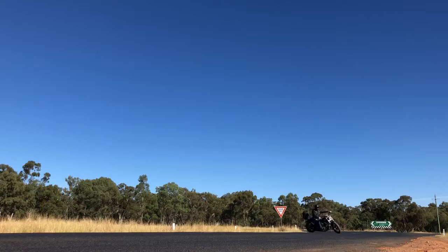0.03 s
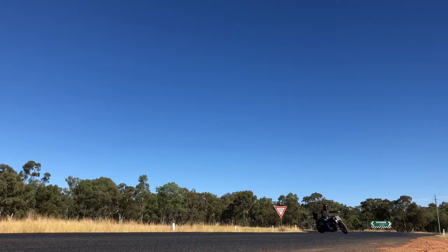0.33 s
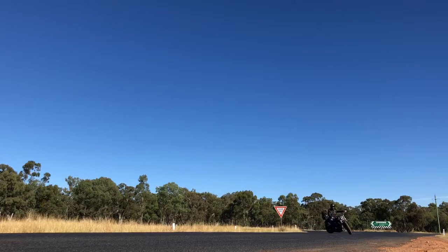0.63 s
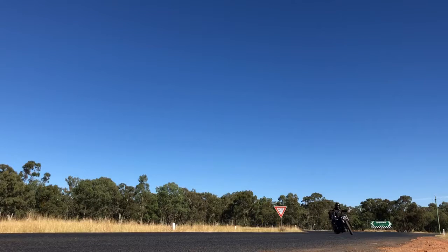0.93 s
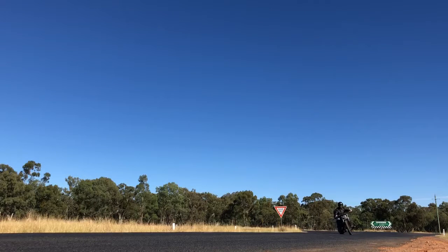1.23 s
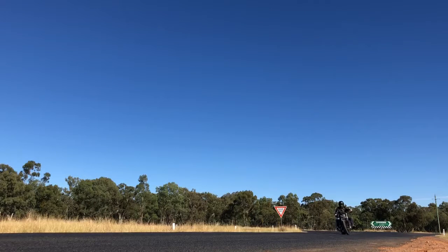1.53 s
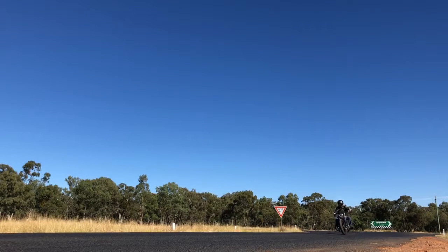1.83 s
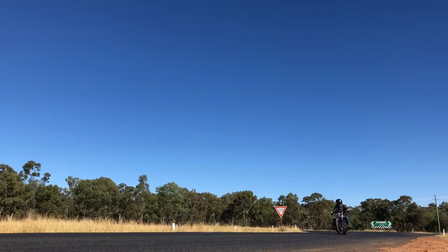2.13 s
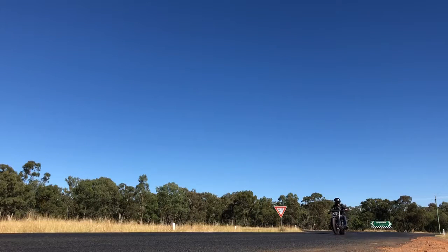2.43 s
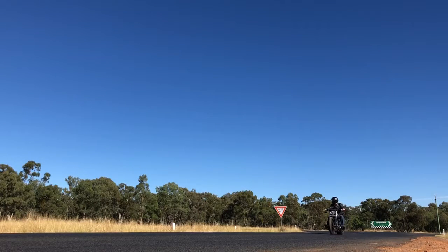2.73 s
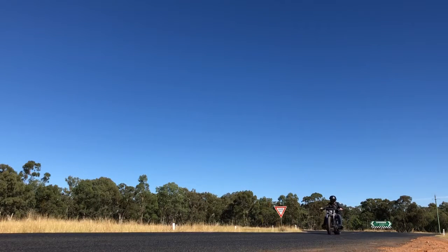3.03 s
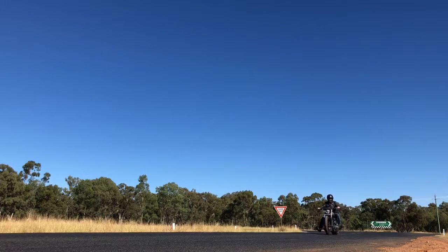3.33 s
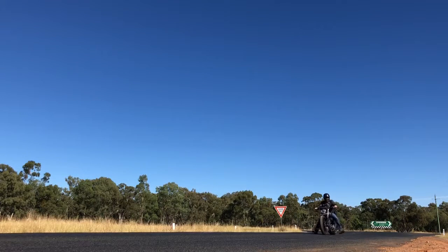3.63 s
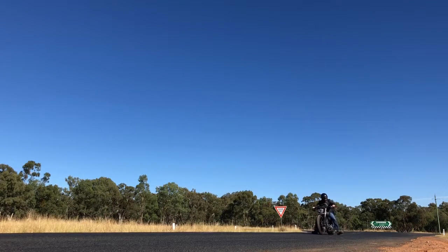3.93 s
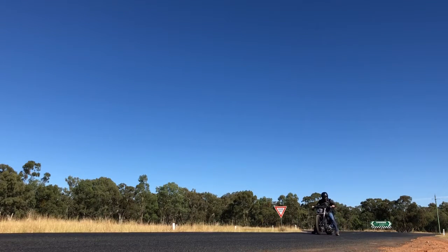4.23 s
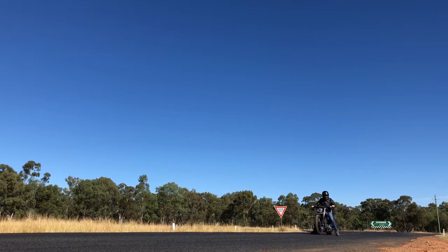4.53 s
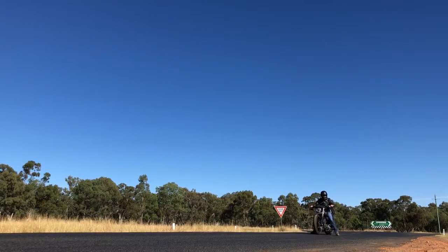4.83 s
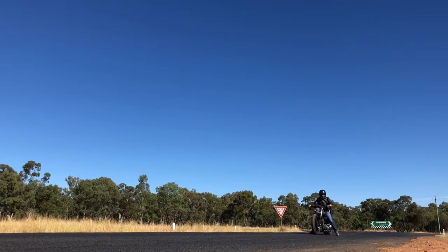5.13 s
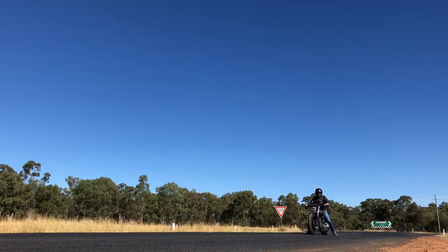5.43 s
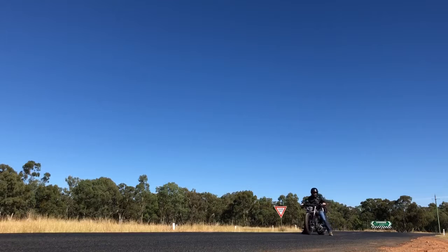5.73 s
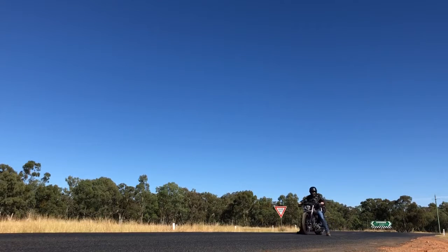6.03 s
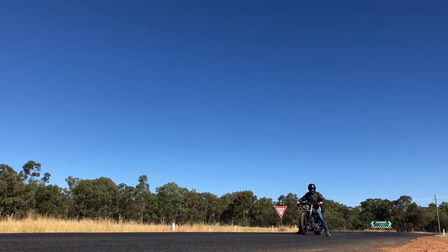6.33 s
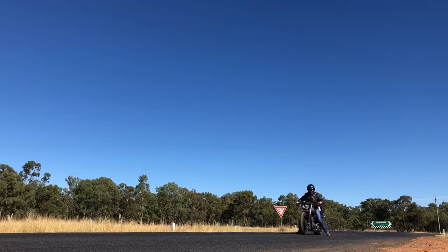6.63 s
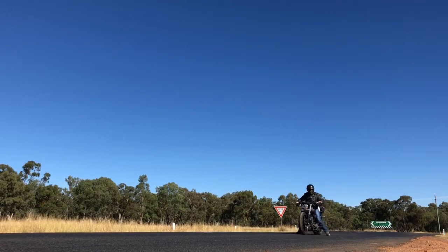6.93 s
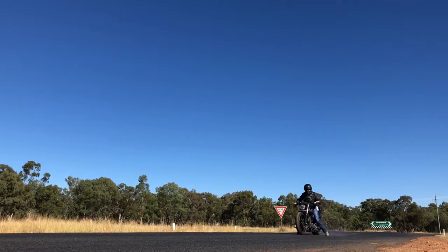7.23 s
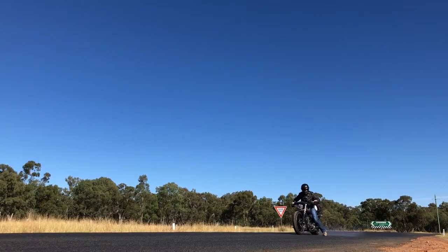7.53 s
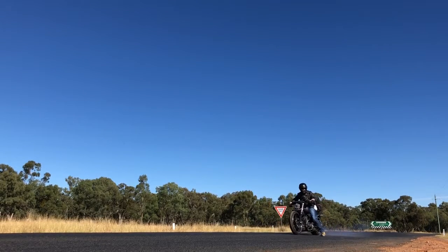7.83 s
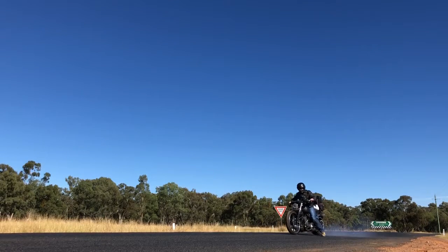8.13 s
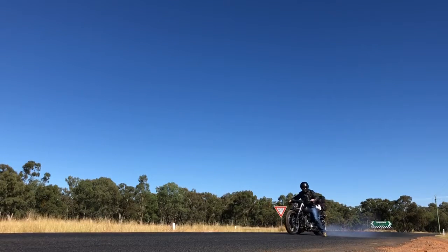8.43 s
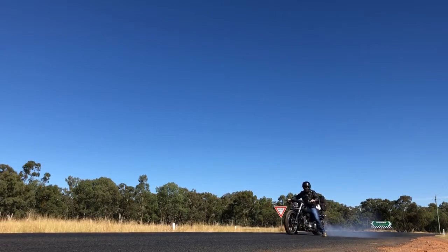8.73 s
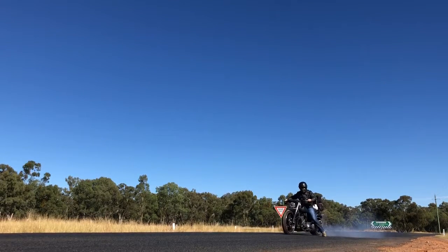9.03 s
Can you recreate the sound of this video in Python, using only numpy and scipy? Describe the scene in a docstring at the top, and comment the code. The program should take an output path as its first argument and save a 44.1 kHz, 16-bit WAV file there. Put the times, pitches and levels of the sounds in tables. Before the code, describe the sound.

Outdoors on an asphalt road, a motorcycle's deep twin-cylinder engine lopes and stumbles, some firings cracking out hard. The throttle opens gently twice, then the engine rises to a loud, rasping rev. It falls briefly and surges into a burnout, holding high revs while the spinning rear tyre adds a hiss and a falling howl. A single microphone picks up a light mechanical whirr and a slight, dull echo.

```python
"""V-twin motorcycle burnout.

A big V-twin lopes at idle with a faint squeak of the brake, revs and starts a burnout.
Unevenly spaced firings ring the exhaust, each with a burst of gas; some bark out hard. Valve gear whirrs.
The rear tyre spins and howls on the asphalt, and a line of trees returns a faint echo."""
import sys
import numpy as np
from scipy import signal
from scipy.fft import rfft, irfft
from scipy.io import wavfile
from scipy.ndimage import uniform_filter1d

SR = 44100
rng = np.random.default_rng(int(sys.argv[2]) if len(sys.argv) > 2 else 0)


def int16_out(signal):
    """Quantize to a 16-bit WAV file."""
    q = np.round(np.clip(np.atleast_2d(signal).T, -1, 1) * 32767)
    wavfile.write(sys.argv[1], SR, q.astype(np.int16))


N = 401310
TIME = np.arange(N) / SR
EASE_START_S, EASE_S = 7.45, 1  # the tyre spins freely and the load eases


def undb(db):
    """Decibels to gain."""
    return 10 ** (np.asarray(db) / 20)


def curves(rows, at=TIME):
    """Each later column of a table, interpolated along the first."""
    knots, *columns = np.transpose(rows)
    return [np.interp(at, knots, column) for column in columns]


def ramp(start_s, length_s):
    """Rise from 0 to 1."""
    return np.clip((TIME - start_s) / length_s, 0, 1)


def convolve(x, response):
    """Pass a sound through an impulse response."""
    return signal.oaconvolve(x, response)[:len(x)]


def colour(x, points, size=16384):
    """Minimum-phase filter with the given (Hz, dB) response, so that peaks ring after a blow."""
    hz, db = np.transpose(points)
    bin_hz = np.arange(size // 2 + 1) * SR / size
    gain = undb(np.interp(np.log(bin_hz + 1), np.log(hz), db))
    cepstrum = irfft(np.log(gain))
    cepstrum[1:size // 2] *= 2
    cepstrum[size // 2 + 1:] = 0
    return convolve(x, irfft(np.exp(rfft(cepstrum))))


def ring(x, hz, width_hz):
    """A resonance whose centre can move, gain 1 at the centre."""
    spin = np.exp(2j * np.pi * np.cumsum(hz) / SR)
    pole = np.exp(-np.pi * width_hz / SR)
    return 2 * np.real(spin * signal.lfilter([1 - pole], [1, -pole], x / spin))


def noise(points):
    """Coloured noise of rms 1."""
    x = colour(rng.standard_normal(N), points)
    return x / x.std()


def wander(rate_hz):
    """Smooth random drift of spread 1."""
    hold = int(SR / rate_hz)
    steps = np.repeat(rng.standard_normal(N // hold + 1), hold)[:N]
    drift = uniform_filter1d(steps, hold)
    return drift / drift.std()


def steady(x, size=4400):
    """Bring the running rms to 1, keeping the pulses inside it."""
    power = uniform_filter1d(uniform_filter1d(x ** 2, size), size)
    return x / np.sqrt(np.maximum(power, 0) + np.mean(x ** 2) / 1e6)


def blend(a, b, share):
    """Mix two unrelated sounds; the first gets this share of the power."""
    share = np.clip(share, 0, 1)
    return np.sqrt(share) * a + np.sqrt(1 - share) * b


def pulses(times_s, sizes):
    """One pulse at each time."""
    return np.bincount(np.clip(times_s * SR, 0, N).astype(int), sizes, N + 1)[:N]


def puff(rise_s, fall_s, tail_s, tail_db):
    """Envelope of a burst of gas: it swells, collapses and leaves a tail."""
    t = TIME[:SR // 8]
    after = np.maximum(t - rise_s, 0)
    decay = np.exp(-after / fall_s) + undb(tail_db) * np.exp(-after / tail_s)
    return np.minimum(t / rise_s, 1) ** 2 * decay


# Each row: time in seconds, engine speed in four-stroke cycles per second.
ENGINE_SPEED_HZ = [(0.0, 8.195), (0.255, 7.178), (0.74, 9.518), (2.622, 9.015), (2.927, 12.311),
                   (3.447, 10.357), (3.845, 13.054), (4.302, 11.848), (4.566, 23.719), (5.068, 23.129),
                   (5.363, 27.529), (5.637, 28.94), (5.72, 28.9), (6.31, 21.16), (6.51, 27.0),
                   (6.725, 23.9), (7.028, 40.288), (7.171, 33.717), (7.686, 41.392), (8.35, 47.009),
                   (8.872, 43.075), (9.1, 42.686)]

def speed():
    """Engine cycles per second; the crank turns twice in each."""
    return curves(ENGINE_SPEED_HZ)[0]


def cycles(start=0.1486):
    """Engine cycles turned so far."""
    return start + np.cumsum(speed()) / SR


def firings(shift_cycles=0, rear_lag_cycles=315 / 720):
    """Times in seconds at which the front and rear cylinders, in turn, reach one point of their cycle."""
    turned = cycles()
    front = np.arange(int(turned[-1]) + 1)
    marks = np.column_stack([front, front + rear_lag_cycles]).ravel()
    return np.interp(marks + shift_cycles, turned, TIME, right=TIME[-1] + 1)


# Each row: opening time in seconds, shutting time in seconds, throttle opening 0-1.
THROTTLE_TWISTS = [(2.543, 2.894, 0.43), (3.53, 3.946, 0.11), (4.24, 5.71, 0.86), (6.314, 6.463, 0.5),
                   (6.674, 9.2, 0.9)]

def throttle(open_s=0.14, shut_s=0.041):
    """Opening 0-1: each twist opens, holds and snaps shut."""
    opening = sum(size * ramp(opens, open_s) * (1 - ramp(shuts, shut_s))
                  for opens, shuts, size in THROTTLE_TWISTS)
    return np.clip(opening, 0, 1)


# Each row: engine cycles per second, effort (0 idle, 1 revving free, 2 under load).
EFFORT_BY_SPEED = [(9.5, 0.23), (20, 1), (25, 1), (32, 1.6)]

def combustion(rough_open=0.085, rough_spin=0.06, rough_idle=0.47, rough_overrun=0.48):
    """Effort and roughness: an open throttle fires evenly, a shut one raggedly."""
    effort = curves(EFFORT_BY_SPEED, speed())[0]
    fed = rough_open + (rough_spin - rough_open) * ramp(EASE_START_S, EASE_S)
    starved = np.interp(effort, [0, 1], [rough_idle, rough_overrun])
    return effort, starved + (fed - starved) * throttle() ** 2


def turbulence(roughness):
    """Churn of the gas, 0-0.62: none under full throttle, most when it is shut."""
    return np.clip(1.9 * (roughness - 0.13), 0, 0.62)


def level_db(knee_db, knee_hz, slopes_db_oct, shut_db, idle_hz=8.86):
    """Level of an engine part from throttle and speed, with one slope below a knee and one above."""
    octaves = np.log2(np.maximum(speed(), idle_hz) / knee_hz)
    return knee_db + octaves * np.where(octaves < 0, *slopes_db_oct) + shut_db * (1 - throttle())


# Each row: time in seconds, dip of the boom in dB.
MISFIRE_DIPS = [(.33, -11), (1.3, -15), (2.15, -4), (2.44, -5), (3.14, -3), (3.3, -1.5), (3.51, -2)]

def stumbles_db(width_s=0.041):
    """The idle's boom dips when a cylinder misses."""
    return sum(db * np.exp(-((TIME - at_s) / width_s) ** 2) for at_s, db in MISFIRE_DIPS)


def disperse(x, centres_hz=(190, 340), q=1.0):
    """Bends in the pipe hold the low notes back, so that a pulse leaves as a short wave train."""
    for hz in centres_hz:
        x = 2 * signal.lfilter(*signal.iirpeak(hz, q, fs=SR), x) - x
    return x


# Pipe response at idle, revving free and under load. Each row: frequency in Hz, gain in dB.
PIPE_IDLE_DB = [(25, -131), (48, -16), (70, -1), (84, 3), (102, 4), (135, -2), (175, -1), (230, -12),
                (320, -28), (450, -27), (620, -16.5), (1000, -22.5), (2000, -80), (5000, -83)]
PIPE_FREE_DB = [(25, -107), (48, -2), (85, 6), (119, 6), (142, 2), (170, -7), (212, 0), (245, -14),
                (315, -3.5), (400, -8.5), (560, -18), (720, -22.5), (1500, -25), (4000, -68)]
PIPE_LOAD_DB = [(25, -48), (45, -11), (80, 12.5), (122, 13.5), (162, -2), (225, 10.5), (275, 1.5),
                (330, 8.5), (440, 9), (570, -2), (690, -10.5), (800, -1.5), (950, -16.5), (1250, -10),
                (2000, -30), (5000, -43)]
# Each row: engine cycles per second, lowest pipe note in Hz.
PIPE_NOTE_HZ = [(9, 68), (13, 114.6), (21.5, 96), (24, 118.4), (28.5, 136.7)]

def pipes(drive, effort):
    """The pipes' tone follows effort; hotter gas lifts their lowest note and strong flow damps it."""
    tone = sum(colour(drive * np.maximum(1 - abs(effort - k), 0), response)
               for k, response in enumerate((PIPE_IDLE_DB, PIPE_FREE_DB, PIPE_LOAD_DB)))
    note = ring(tone, curves(PIPE_NOTE_HZ, speed())[0], width_hz=17)
    return tone + undb(7) * np.minimum(2 - effort, 1) * note


def rebound(x, strength, periods=1.08):
    """The blast runs back up the pipe and comes out again, about one period of its note later."""
    delay_s = periods / curves(PIPE_NOTE_HZ, speed())[0]
    return x + 0.25 * strength * np.interp(TIME - delay_s, TIME, x)


# Gas churning in the pipe. Each row: frequency in Hz, gain in dB.
BURBLE_DB = [(110, -16.5), (200, 0.5), (250, 2.5), (310, 4), (390, -4), (480, -3.5), (620, -13.5),
             (900, -26.5), (2000, -44.5)]

def exhaust(scatter_db=5, rear_idle_db=-3, overlap_lag_cycles=0.33):
    """Pressure slugs ring the pipes; valve overlap adds a gulp after each, most with the throttle shut."""
    times = firings()
    effort, roughness = combustion()
    rough = np.interp(times, TIME, roughness)
    idling = np.interp(times, TIME, np.clip(1 - effort, 0, 1))
    slug_draw, slug_shift, gulp_shift, gulp_draw = rng.standard_normal((len(times), 4)).T
    jitter_s = 0.0009 * rough
    rear = np.arange(len(times)) % 2
    slug_sizes = undb(scatter_db * rough * slug_draw + rear_idle_db * rear * idling)
    slugs = pulses(times + jitter_s * slug_shift, slug_sizes)
    gulp_sizes = (0.51 + 1.7 * idling) * rough * undb(5.1 * gulp_draw)
    gulps = pulses(firings(overlap_lag_cycles) + 2 * jitter_s * gulp_shift, gulp_sizes)
    tone = pipes(disperse(slugs - uniform_filter1d(gulps, size=90)), effort)
    boom = signal.sosfiltfilt(signal.butter(4, 190, fs=SR, output="sos"), tone)
    # soft firings burble instead of rasping
    churn = convolve(slugs, puff(rise_s=0.0055, fall_s=0.054, tail_s=0.12, tail_db=1))
    burble = steady(noise(BURBLE_DB) * churn)
    rasp = blend(burble, steady(tone - boom), turbulence(roughness))
    boom_db = level_db(knee_db=-17, knee_hz=21, slopes_db_oct=(11.5, -1), shut_db=-1.5)
    rasp_db = level_db(knee_db=-15, knee_hz=27, slopes_db_oct=(14.5, 1.1), shut_db=-5.5)
    return steady(boom) * undb(boom_db + stumbles_db()) + rasp * undb(rasp_db)


# Turbulent gas. Each row: frequency in Hz, gain in dB.
RUSH_DB = [(100, -17), (250, -42.5), (400, 0.5), (560, 7.5), (780, 9), (980, 5), (1250, 2.5), (1600, -7),
           (1900, -7.5), (2300, -37), (4000, -33), (15000, -52)]
# Each row: time in seconds, centre in Hz of a hollow in the rush.
HOLLOW_HZ = [(0, 480), (4.0, 557), (4.5, 724), (5.1, 780), (5.4, 867), (6.9, 940), (7.8, 1010), (8.3, 715),
             (9.1, 720)]

def gas_rush(blows, effort, churn):
    """A turbulent rush, lingering after rough firings, and a repeating slap that gives the snarl."""
    bursts = convolve(blows, puff(rise_s=0.0007, fall_s=0.005, tail_s=0.02, tail_db=-22))
    rush = steady(noise(RUSH_DB) * (bursts + 1.3 * churn))
    slap = steady(colour(disperse(blows, centres_hz=(600, 950, 1250), q=2.07), RUSH_DB))
    blast = blend(rush, slap, share=0.17 + 1.25 * churn)
    blast = rebound(blast, strength=np.minimum(2 - effort, 1))
    return steady(blast - 1.34 * ring(blast, curves(HOLLOW_HZ)[0], width_hz=128))


# Crack of an ordinary firing. Each row: frequency in Hz, gain in dB.
CRACK_DB = [(600, 2.5), (1500, 6.5), (2200, -3.5), (2900, 1), (4000, -5), (5200, -3), (6200, -2.5),
            (8500, -9.5), (10500, -16.5), (13000, -22), (16000, -22)]

def gas_crack(blows, churn):
    """The wave steepens and cracks a moment after each firing, partly alike every time."""
    burst = puff(rise_s=0.0036, fall_s=0.0014, tail_s=0.0047, tail_db=-9)
    alike = colour(convolve(blows, burst * rng.standard_normal(len(burst))), CRACK_DB)
    fresh = noise(CRACK_DB) * convolve(blows, burst)
    return blend(steady(fresh), steady(alike), share=0.51 + churn)


def gas(scatter_db=4, rear_db=-3):
    """Each firing ejects gas with a rush and a crack; both soften at idle and as the load eases."""
    times = firings()
    effort, roughness = combustion()
    churn = turbulence(roughness)
    size_draw, crack_draw = rng.standard_normal((len(times), 2)).T
    rear = np.arange(len(times)) % 2
    sizes = undb(scatter_db * np.interp(times, TIME, roughness) * size_draw + rear_db * rear)
    rush = gas_rush(pulses(times, sizes), effort, churn)
    crack = gas_crack(pulses(times, sizes * undb(0.95 * crack_draw)), churn)
    eased = ramp(EASE_START_S, EASE_S)
    idling, loaded = np.clip(1 - effort, 0, 1), np.maximum(effort - 1, 0)
    rush_db = -0.5 + 2 * loaded
    crack_db = -10 + 6 * throttle() - 5 * eased - 2.5 * idling
    gas_db = level_db(knee_db=-17.5, knee_hz=25.5, slopes_db_oct=(12, -1.1), shut_db=-13) - 5.5 * eased
    return undb(gas_db) * (rush * undb(rush_db) + crack * undb(crack_db))


# Each row: start in seconds, rush level in dB, crack level in dB, both before trim.
HARD_FIRINGS = [(.107, -30.5, -31), (.167, -36, -40), (.239, -27.5, -30), (0.377, -27, -30.5),
                (.431, -27, -27.5), (.497, -27.5, -29), (0.612, -26, -29.5), (.723, -29, -32),
                (0.875, -34, -34), (.935, -33, -36.5), (1.083, -36, -39), (1.143, -33, -41.5),
                (1.363, -30.5, -38.5), (1.416, -30, -39), (1.579, -33, -42), (1.791, -30, -47),
                (2.002, -32, -45), (2.224, -31, -42), (2.338, -32, -41.5), (2.493, -34, -44),
                (2.558, -31, -39.5), (2.662, -29, -37), (2.767, -39, -39), (2.857, -23, -33),
                (4.37, -20, -25.5), (5.874, -10, -20.5), (6.698, -10.5, -18.5)]
# Crack of a hard firing. Each row: frequency in Hz, gain in dB.
BARK_CRACK_DB = [(900, -18), (1800, 18), (2500, 6.5), (3500, 4.5), (5500, 7.5), (7500, 5), (10000, -4.5),
                 (15000, -18)]

def barks(rush_trim_db=-4, crack_trim_db=-2):
    """A cylinder that catches a full charge fires hard and bright."""
    times, rush_db, crack_db = np.transpose(HARD_FIRINGS)
    rush_puff = puff(rise_s=0.00069, fall_s=0.0092, tail_s=0.08, tail_db=-24)
    crack_puff = puff(rise_s=0.0058, fall_s=0.0038, tail_s=0.034, tail_db=-24)
    rush = convolve(pulses(times, undb(rush_db + rush_trim_db)), rush_puff)
    crack = convolve(pulses(times, undb(crack_db + crack_trim_db)), crack_puff)
    return rush * noise(RUSH_DB) + crack * noise(BARK_CRACK_DB)


# Each row: time in seconds, hiss level in dB, howl level in dB before trim, howl pitch in Hz.
TYRE_SPIN = [(6.75, -70, -73, 1480), (6.95, -41, -33, 1440), (7.4, -32.5, -26, 1370), (7.9, -31, -30, 1270),
             (8.3, -28, -24, 1210), (8.7, -28.5, -24, 1116), (9.1, -29.5, -29, 1200)]
# Tearing rubber. Each row: frequency in Hz, gain in dB.
TYRE_HISS_DB = [(1000, -0.5), (1700, -0.5), (2010, -5.5), (2160, -5), (2330, -8), (2750, -1), (3190, -8),
                (4070, -11.5), (5520, -6.5), (6830, -11.5), (7780, -9), (15600, -23)]

def tyre(width_hz=260, howl_trim_db=-2):
    """Rubber hisses over asphalt; its stick-slip howl, jerked by each firing, sinks as the tread heats."""
    hiss_db, howl_db, howl_hz = curves(TYRE_SPIN)
    times = firings()
    jerks = pulses(times, np.ones(len(times)))
    slips = blend(steady(jerks), rng.standard_normal(N), share=0.2)
    howl = ring(ring(slips, howl_hz, width_hz), howl_hz, width_hz)
    hiss = noise(TYRE_HISS_DB) * undb(hiss_db + 0.75 * wander(rate_hz=170))
    spinning = TIME > TYRE_SPIN[0][0]
    return (howl / howl.std() * undb(howl_db + howl_trim_db) + hiss) * spinning


# Tappets and chain. Each row: frequency in Hz, gain in dB.
WHIRR_DB = [(1060, 5), (1800, 1.5), (1930, 3.5), (2160, -1), (2610, 0), (3270, -2), (3540, -1.5),
            (3840, -4.5), (4290, -5.5), (6610, -1), (7170, -5), (8990, -4.5), (9750, -7), (14300, -18.5),
            (15600, -44)]

def valve_gear():
    """Tappets and chain whirr, pulsing slightly with each turn of the crank, duller while far off."""
    whirr_db = level_db(knee_db=-37.5, knee_hz=22, slopes_db_oct=(13.5, 7), shut_db=-0.5)
    crank_beat = 1 + 0.044 * np.cos(2 * np.pi * 2 * cycles())
    whirr = noise(WHIRR_DB) * undb(whirr_db + wander(rate_hz=33)) * crank_beat
    near = ramp(start_s=2.3, length_s=0.7)
    return near * whirr + (1 - near) * colour(whirr, [(6500, 0), (11000, -11)])


def brake(start_s=1.39, length_s=0.15, hz=3000, width_hz=380, db=-58):
    """The brake squeaks faintly as the bike slows."""
    swell = np.sin(np.pi * ramp(start_s, length_s))
    centre_hz = np.full(N, hz)
    squeak = ring(ring(rng.standard_normal(N), centre_hz, width_hz), centre_hz, width_hz)
    return undb(db) * swell * squeak / squeak.std()


# Echo off the trees. Each row: frequency in Hz, gain in dB.
ECHO_DB = [(60, -26), (300, -19), (900, -17), (2500, -19), (8000, -24), (15000, -30)]

def trees(x, t60_s=0.28, rise_s=0.0033):
    """Trunks and verge scatter back a dull, diffuse echo."""
    t = TIME[:SR]
    tail = rng.standard_normal(SR) * undb(-60 * t / t60_s) * np.minimum(t / rise_s, 1)
    return colour(convolve(x, tail / np.linalg.norm(tail)), ECHO_DB)


def scene():
    """The motorcycle and its echo, in mono."""
    bike = exhaust() + gas() + barks() + valve_gear() + brake() + tyre()
    return (bike + trees(bike))[None]


def record(dry, ceiling=0.67, top_hz=15750):
    """The phone rounds off the loudest peaks and cuts the top."""
    rounded = dry / (1 + (dry / ceiling) ** 6) ** (1 / 6)
    return signal.sosfilt(signal.ellip(10, 0.2, 80, top_hz, fs=SR, output="sos"), rounded)


dry = scene()
out = record(dry)
int16_out(out)
```